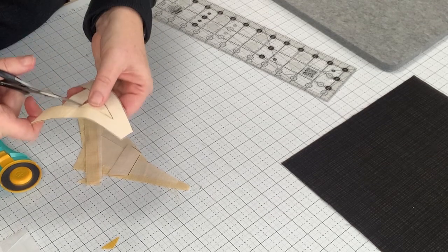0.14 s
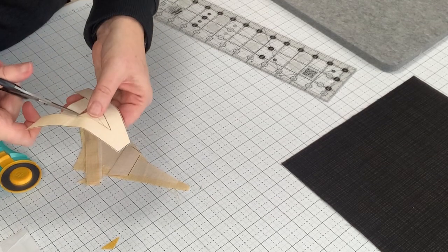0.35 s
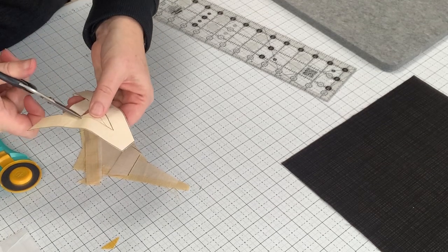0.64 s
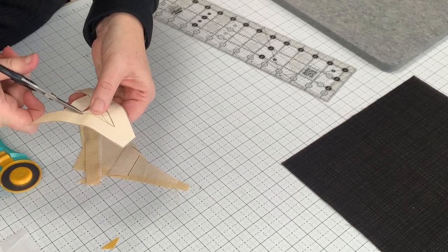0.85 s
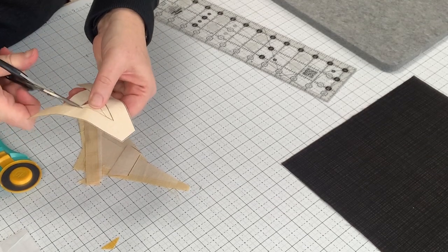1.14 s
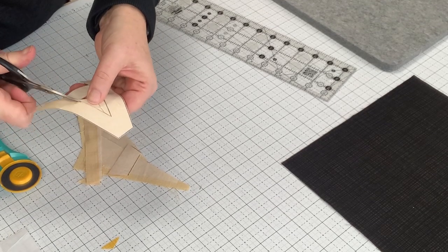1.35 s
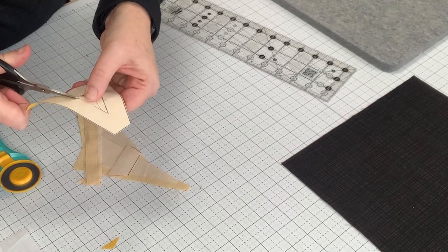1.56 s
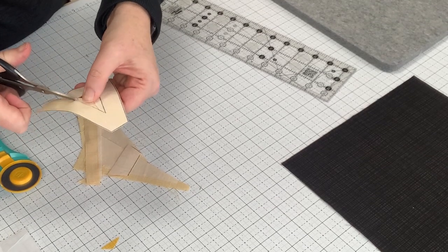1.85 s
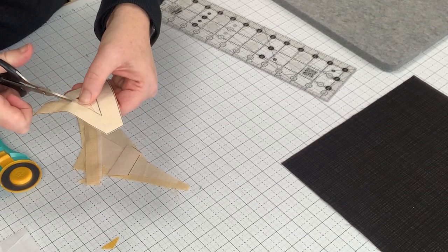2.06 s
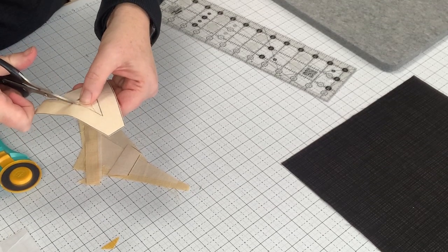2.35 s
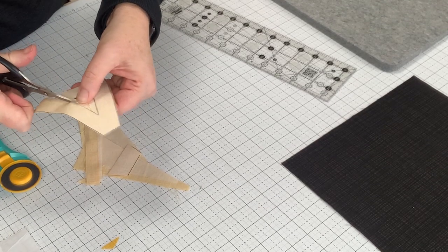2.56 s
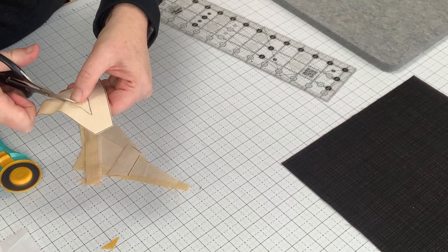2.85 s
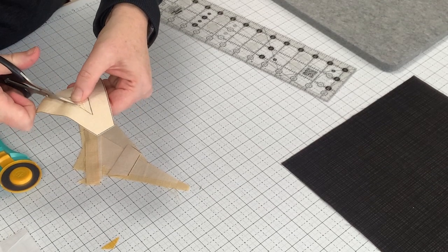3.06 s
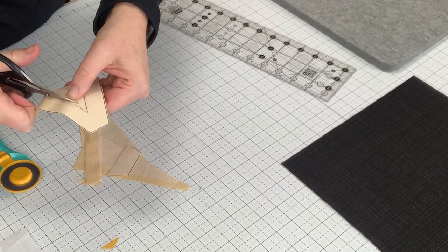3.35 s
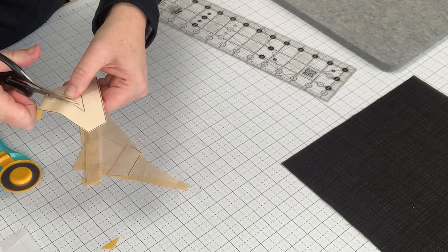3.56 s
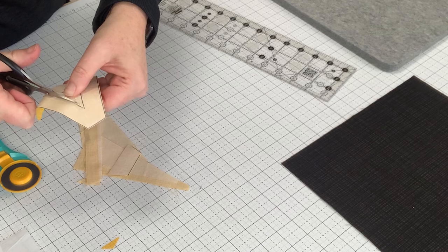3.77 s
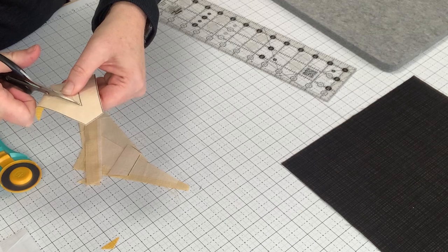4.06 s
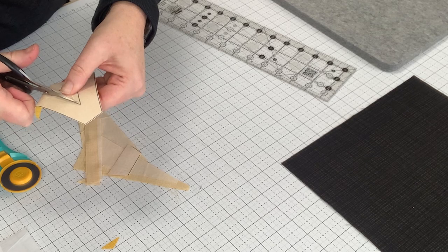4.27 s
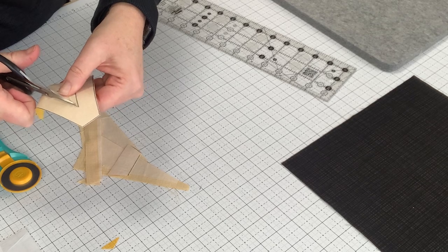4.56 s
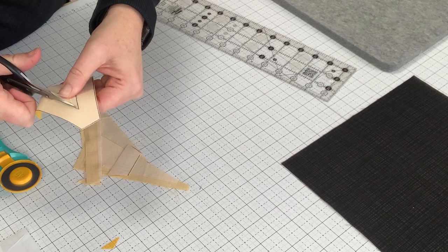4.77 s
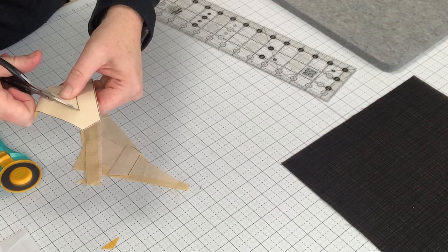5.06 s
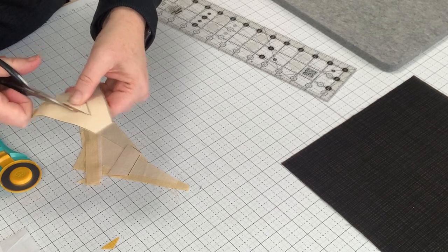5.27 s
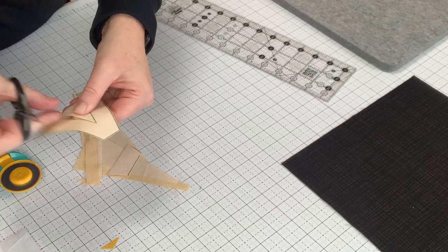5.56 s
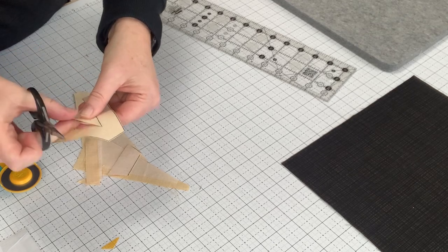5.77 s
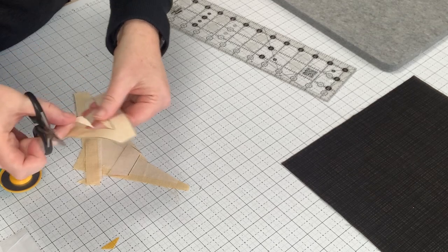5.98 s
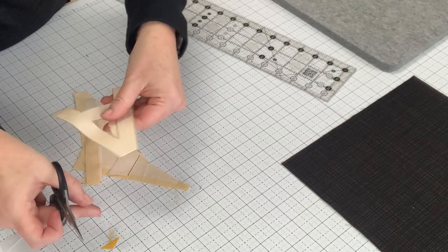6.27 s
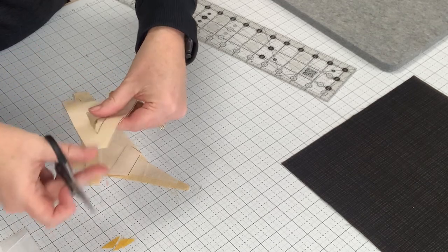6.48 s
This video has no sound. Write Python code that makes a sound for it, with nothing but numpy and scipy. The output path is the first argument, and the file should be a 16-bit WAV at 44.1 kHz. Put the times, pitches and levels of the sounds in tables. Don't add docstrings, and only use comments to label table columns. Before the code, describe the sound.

Close, dry scissor cuts in backed cloth, short rasping strokes and tiny thread ticks, two sharp snips shut, in a quiet room with deep rumble.

```python
import sys
import numpy as np
from scipy import signal
from scipy.fft import rfft, irfft, next_fast_len
from scipy.io import wavfile
from scipy.ndimage import uniform_filter1d, map_coordinates

SR = 44100
rng = np.random.default_rng(int(sys.argv[2]) if len(sys.argv) > 2 else 0)


def natural_amplitude(level_db):
    exponent = np.asarray(level_db, float) / 20
    return 10 ** exponent


def digitize_waveform(pressure):
    field = np.atleast_2d(pressure).T
    bounded = np.clip(field, -1, 1)
    quanta = np.round(bounded * 32767).astype(np.int16)
    wavfile.write(sys.argv[1], SR, quanta)


N = 292199
FRAY_MID = 0.34


def unit(x):
    return x / np.sqrt(np.mean(x ** 2) + 1e-20)


def along(points, hz):
    point_hz, value = np.transpose(points)
    return np.interp(np.log(hz + 1), np.log(point_hz + 1), value)


def curve(points):
    point_s, value = np.transpose(points)
    return np.interp(np.arange(N) / SR, point_s, value)


def wobble(rate_hz):
    knots = rng.standard_normal(int(N * rate_hz / SR) + 4)
    return map_coordinates(knots, [np.arange(N) * rate_hz / SR])


def filtered(x, response):
    m = next_fast_len(N + SR // 2)
    return irfft(rfft(x, m) * response(np.fft.rfftfreq(m, 1 / SR)), m)[..., :N]


def noise(spectrum):
    return unit(filtered(rng.standard_normal(N), lambda hz: natural_amplitude(along(spectrum, hz))))


def resonant(x, modes, steep=1.45):
    def response(hz):
        total = 0
        for k, (centre_hz, width_hz, db) in enumerate(modes):
            damping = 1j * hz * width_hz
            total = total + (-1) ** k * natural_amplitude(db) * damping / (centre_hz ** 2 - hz ** 2 + damping)
        return unit(np.abs(total) ** steep) * np.exp(1j * np.angle(total))
    return filtered(x, response)


def shares(db, bite, taut, fray=FRAY_MID):
    cloth_db = -10 + 18 * taut
    tip_db = -12.5 + 25 * bite
    fizz_db = -17.5 + 13 * bite + 7.5 * taut + 16 * (fray - FRAY_MID)
    return natural_amplitude(db + np.array([0, cloth_db, tip_db, fizz_db]))[:, None]


def stroke_force():
    # start in seconds, length in seconds, force in dB, bite (0 pivot, 1 tips), cloth tension (0-1).
    closing = [(1.285, .045, -57.5, 0.48, .4), (1.45, 0.033, -60.5, .5, 0.64),
               (1.68, 0.11, -62.5, .35, 0.83), (2.21, 0.12, -55, 0.26, 0.62),
               (2.36, 0.086, -57.5, .3, 0.57), (2.895, .1, -57, .52, 0.78), (3.03, 0.093, -57, 0.46, 0.84),
               (3.22, 0.14, -57.5, 0.77, 0.92), (3.98, 0.037, -63, .15, .55),
               (4.212, 0.048, -51.5, .35, 0.72), (4.85, 0.13, -60, 0.59, 0.67), (5.23, 0.13, -66, 0.53, .7),
               (5.86, 0.13, -63.5, 0.53, 0.67)]
    drags = [
        (1.58, .1, -67, .45, .6),
        (2.49, 0.082, -66, 0.56, 0.87),
        (2.628, 0.15, -53.5, 0.59, 0.69),
        (5.57, 0.05, -65, .4, 0.93),
        (6.34, 0.27, -64, .35, 0.78),
    ]
    pressing = [
        (.82, .08, -68, .36, .66),
        (1.993, 0.11, -68, .72, 0.72),
        (3.437, .092, -57.5, .5, 0.73),
        (3.64, 0.23, -67, 0.72, 0.68),
        (4.455, .04, -73, .64, .72),
        (4.58, 0.19, -69, 0.76, .6),
        (6.28, 0.042, -71, .7, 1),
    ]
    kinds = ((closing, (.35, .45, 8, 11)), (drags, (.05, .2, 3, 12)), (pressing, (.3, .3, 0.5, 0.5)))
    force, t = np.zeros((4, N)), np.arange(N) / SR
    for rows, (rise, hold, start_db, end_db) in kinds:
        for start_s, length_s, db, bite, taut in rows:
            age = t - start_s
            corners = [0, rise, min(rise + hold, .98), 1]
            shape_db = np.interp(age / length_s, corners, [-start_db, 0, 0, -end_db])
            inside = np.interp(age, [-.006, 0, length_s, length_s + .004], [0, 1, 1, 0])
            force += shares(db, bite, taut) * natural_amplitude(shape_db) * inside
    clumps = unit(natural_amplitude(2.6 * wobble(120)))
    return natural_amplitude(-1.5) * clumps * force


def thread_force():
    # time in seconds, peak in dB, bite (0-1), cloth tension (0-1), fibre spray (0-1).
    threads = [(0.8275, -44.5, 0.58, 0.83, 0.8), (0.8726, -37.5, .28, 0.58, .5),
               (2.0093, -47.5, .72, 0.75, 1.1), (2.03, -48.5, 0.93, .66, 0.6), (2.077, -37, 0.48, .3, 0.8),
               (3.6526, -46.5, .24, .8, .3), (3.698, -43.5, .66, 0.95, .3), (3.7199, -39.5, 0.53, .75, .4),
               (3.7454, -40.5, 0.7, 0.93, .55), (3.7813, -46.5, .72, .72, .65),
               (3.824, -42.5, .56, 0.72, 0.95), (4.4552, -40, 0.79, .8, .6), (4.483, -46.5, .72, .7, .3),
               (4.521, -55, 0.92, .4, .1), (4.5984, -51, 0.89, 0.89, .5), (4.631, -37.5, 0.71, .58, .4),
               (4.683, -44, 0.65, .4, .5), (4.69, -42, 0.85, 0.71, .35), (4.708, -41, .28, .2, .3),
               (4.7278, -37.5, 0.64, 0.26, .2), (4.7467, -35.5, 0.83, 0.41, .45),
               (4.7533, -25.5, .35, 0.7, .05), (5.2344, -50.5, 0.61, 0.96, .5), (5.735, -52, .52, 0.85, .6)]
    # time in seconds, peak in dB, bite (0-1), tension (0-1).
    snags = [(2.214, -43, .12, 0.58), (2.268, -46, .05, .05), (2.285, -40, .05, .1), (2.633, -34, 0.38, .7),
             (2.6514, -46, 0.57, .6), (2.674, -36.5, .28, 0.44), (2.711, -48, .95, .85),
             (2.782, -47.5, .36, 0.8), (2.8993, -52, .4, .5), (3.2271, -49, .44, .45),
             (3.243, -41, 0.61, .7), (3.269, -37, .3, .4), (3.289, -38, 0.69, .3), (3.3024, -47, .5, .6),
             (3.85, -50, .6, .5), (4.4605, -49, .7, 0.82), (4.585, -53, 0.87, .4), (4.6544, -51, .8, .4),
             (3.4391, -41, .2, .35), (4.214, -45, .05, .2), (4.9746, -44, .2, .45)]
    strain_s, longer_per_db = 0.0045, -0.03
    lead = SR // 50
    force, t = np.zeros((4, N + SR)), np.arange(-lead, SR // 25) / SR
    for time_s, db, *grip in threads + snags:
        width_s = np.clip(strain_s * (1 + longer_per_db * (db + 46)), .001, .012)
        u = (t - .002) / width_s
        swell = np.exp(-np.abs(np.where(u < 0, 1.3 * u, u)) ** 1.35)
        force[:, round(time_s * SR) - lead:][:, :len(t)] += shares(db - 10.0, *grip) * swell
    return force[:, :N]


def cutting():
    # centre in Hz, width in Hz, level in dB.
    edge = [(4570, 160, -11), (4800, 750, 1.5), (5300, 124, 4), (5550, 155, 2.5), (6030, 38, -0.5)]
    cloth = [(1475, 750, -1), (2220, 470, 1.5), (2864, 480, 1.5), (3280, 116, 3.5), (3606, 132, 2.5),
             (3974, 69, 3), (4290, 240, 1)]
    tip = [(6550, 360, -6), (6960, 150, -0.5), (7600, 130, -0.5), (7645, 74, 4), (8150, 1100, -3.5),
           (8800, 67, -14.5)]
    fizz = [(9730, 2500, 1.5), (13500, 1600, -1.5)]
    force = np.hypot(stroke_force(), thread_force())
    chance, size, sign = rng.random((3, N))
    breaking = chance < 2500 / SR
    breaks = unit(breaking * natural_amplitude(-4 * np.log(size + .02)) * np.sign(sign - .5))
    cut = np.zeros(N)
    for drive, body in zip(force, (edge, cloth, tip, fizz)):
        rub = rng.standard_normal(N)
        cut += resonant(drive * (0.68 * rub + 0.48 * breaks), body)
    z = signal.stft(cut, nperseg=256)[2]
    shift = uniform_filter1d(rng.standard_normal(z.shape), size=3, axis=0)
    shift = uniform_filter1d(shift, size=7, axis=1)
    return signal.istft(z * unit(natural_amplitude(0.64 * unit(shift))), nperseg=256)[1][:N]


def snaps():
    # time in seconds, peak in dB, T60 in seconds, brightness in dB per octave.
    closures = [
        (0.3224, -31, 0.026, 0.3),
        (4.7557, -33.5, 0.031, -1.5),
    ]
    # frequency in Hz, level in dB per Hz.
    crack_colour = [(180, -29), (350, -14.5), (550, -5), (1200, -4), (2300, -6), (4200, -4), (6000, -12),
                    (9000, -14.5), (12000, -26), (15800, -38)]
    out, t = np.zeros(N), np.arange(N) / SR
    for time_s, db, t60_s, tilt_db in closures:
        age = np.clip(t - time_s, 0, 1)
        colour = [(hz, level + tilt_db * np.log2(hz / 3000)) for hz, level in crack_colour]
        fade = natural_amplitude(-60 * age / t60_s) * (1 - np.exp(-age / 0.00024))
        z = rfft(fade * rng.standard_normal(N))
        power = uniform_filter1d(np.abs(z) ** 2, size=round(500 * N / SR))
        even = irfft(z / np.sqrt(power), N)
        crack = (age > 0) * filtered(even, lambda hz: natural_amplitude(along(colour, hz)))
        out += natural_amplitude(db) * crack * np.linalg.norm(fade) / np.linalg.norm(crack)
    return out


def backing():
    # time in seconds, peak in dB, pitch in Hz, T60 in seconds.
    flexes = [(1.74, -54, 1810, 0.088), (2.0785, -42, 5130, .025), (2.315, -50, 830, 0.053),
              (2.97, -50, 1560, .07), (3.12, -50, 3030, .04), (3.31, -49, 920, .05), (3.325, -48, 786, .04),
              (3.447, -46, 915, 0.091), (3.485, -51, 884, 0.094), (4.23, -50, 825, .05),
              (4.9, -54, 2000, 0.058), (5.295, -47.5, 1540, 0.046)]
    out, t = np.zeros(N + SR), np.arange(SR // 8) / SR
    for time_s, db, hz, t60_s in flexes:
        bend = np.cumsum(rng.normal(0, .05, len(t)))
        fade = natural_amplitude(db - 60 * t / t60_s) * (1 - np.exp(-t / 0.0011))
        out[round(time_s * SR):][:len(t)] += fade * np.sin(2 * np.pi * hz * t + bend)
    return out[:N]


def room(x):
    # frequency in Hz, returned level in dB.
    walls = [(300, -4.5), (1500, -2), (3500, -2.5), (8000, -6)]
    # frequency in Hz, T60 in seconds.
    decay = [(300, 0.17), (1500, 0.25), (3500, 0.15), (6000, 0.3), (12000, 0.11)]
    hz, t, z = signal.stft(rng.standard_normal(SR // 3), SR, nperseg=256)
    tail_db = along(walls, hz)[:, None] - 60 * t / along(decay, hz)[:, None]
    tail = signal.istft(z * natural_amplitude(tail_db), SR, nperseg=256)[1]
    return signal.fftconvolve(np.pad(x, (150, 0)), tail / np.linalg.norm(tail))[:N]


def motor_hum():
    # time in seconds, load share of the fast motor (0-1).
    load = [(0, 0.4), (.15, 0.94), (.45, .2), (.9, 0.5), (1.3, 0.2), (2.5, 0), (2.85, 0.38), (3.65, 0.37),
            (4.0, 0), (4.5, 0.66), (4.8, 0.75), (5.4, 0.87), (6.63, 0.84)]
    motor_hz = [41.8, 59.6]
    full_db, idle_drop_db = [-43, -41], [-13, -23.5]
    fast = curve(load)
    hum = np.zeros(N)
    for hz, db, drop_db, idle in zip(motor_hz, full_db, idle_drop_db, (fast, 1 - fast)):
        level = natural_amplitude(db + drop_db * idle + 2.3 * wobble(5))
        hum += level * np.sin(2 * np.pi * np.cumsum(hz + 1.038 * wobble(6)) / SR)
    return hum


def ventilation():
    # time in seconds, deep rumble level in dB.
    flow = [(0.0, -45.5), (1.4, -40), (2.1, -46), (2.25, -48.5), (3.3, -40), (3.97, -44), (4.17, -51),
            (4.5, -44), (5.33, -50.5), (6.63, -48)]
    # frequency in Hz, level in dB per Hz.
    deep = [(8, -26), (18, 5), (25, 6.5), (36, -9.5), (60, -54), (200, -120)]
    air_colour = [(24, -12.5), (40, -3.5), (73, -6.5), (109, -14.5), (193, -16.5), (296, -24), (692, -29.5),
                  (1140, -34), (1600, -34), (3000, -37.5), (6000, -39.5), (10000, -41), (14600, -42),
                  (15800, -42)]
    # centre in Hz, width in Hz, level in dB.
    duct_modes = [(193.5, 4.3, -65), (123.7, 19.5, -61.5), (85.9, 16.5, -59), (930, 270, -66)]
    rumble = natural_amplitude(curve(flow)) * noise(deep)
    air = natural_amplitude(-48) * noise(air_colour)
    swell = natural_amplitude(2.06 * wobble(2.48)) - 1
    air = air + swell * filtered(air, lambda hz: 1 / (1 + (hz / 350) ** 4))
    ducts = np.zeros(N)
    for hz, width_hz, db in duct_modes:
        ducts += natural_amplitude(db) * unit(resonant(rng.standard_normal(N), [(hz, width_hz, 0)], steep=1.34))
    whistle = natural_amplitude(-85) * np.sin(2 * np.pi * 15272 * np.arange(N) / SR)
    return motor_hum() + rumble + air + ducts + whistle


def microphone_hiss():
    # frequency in Hz, level in dB per Hz.
    hiss_colour = [(12, -39), (20, -37), (65, -18), (107, -29), (149, -14), (300, -6), (1390, -9),
                   (2000, -9.5), (14500, -8), (15800, -10)]
    return natural_amplitude(-59.5) * np.array([noise(hiss_colour), noise(hiss_colour)])


def scene():
    cut, snap = cutting() + backing(), snaps()
    reflected = room(natural_amplitude(-14) * cut + natural_amplitude(-7.0) * snap)
    return cut + snap + reflected + ventilation() + microphone_hiss()


def low_pass(x):
    return signal.sosfilt(signal.butter(12, 15920, fs=SR, output="sos"), x)


def record(dry):
    mix = filtered(dry, lambda hz: hz < 15770)
    return low_pass(mix)


dry = scene()
out = record(dry)
digitize_waveform(out)
```